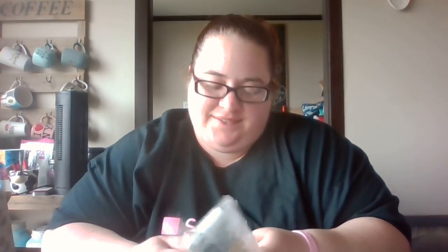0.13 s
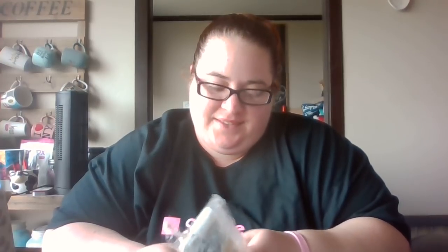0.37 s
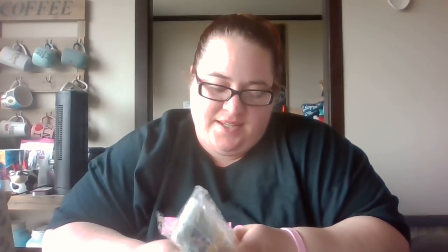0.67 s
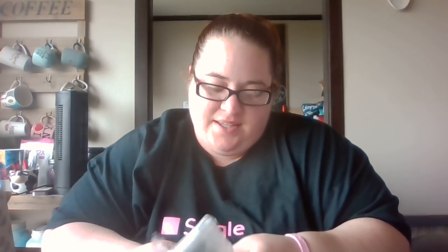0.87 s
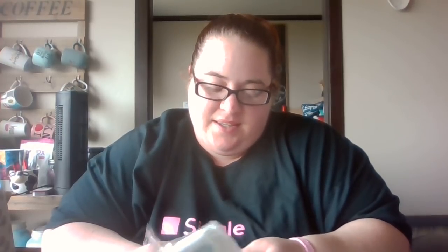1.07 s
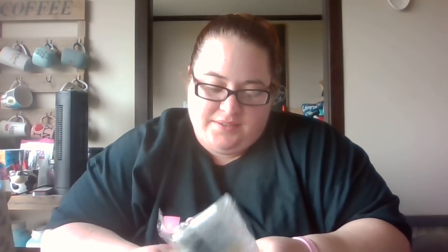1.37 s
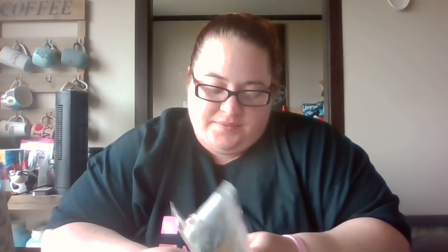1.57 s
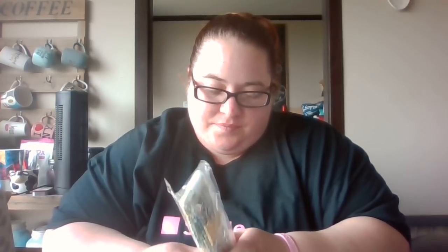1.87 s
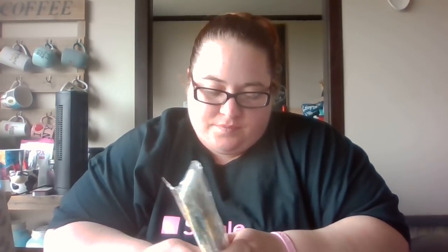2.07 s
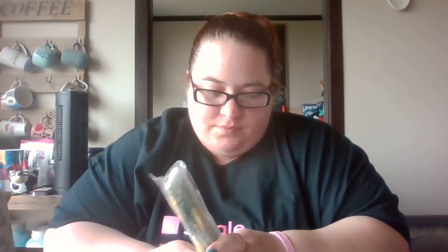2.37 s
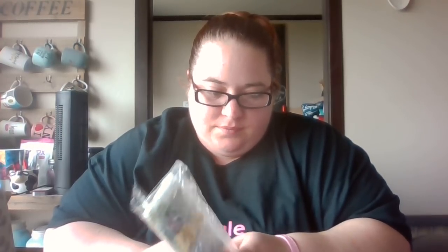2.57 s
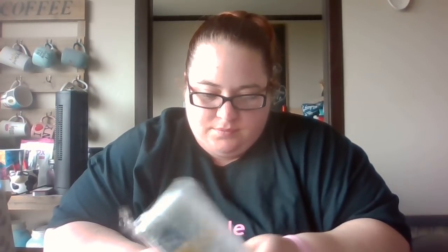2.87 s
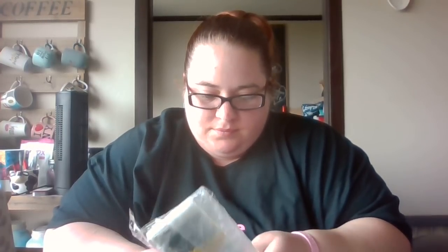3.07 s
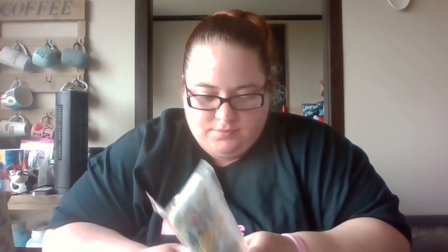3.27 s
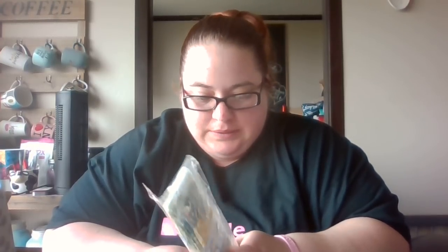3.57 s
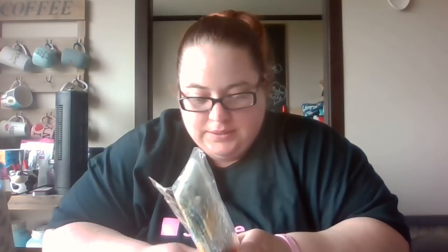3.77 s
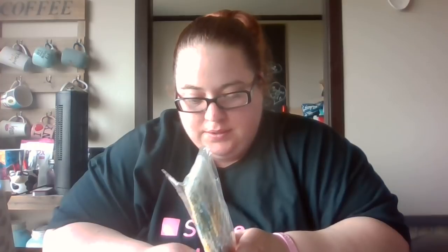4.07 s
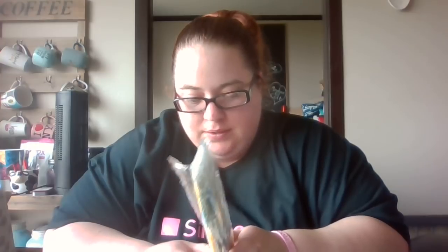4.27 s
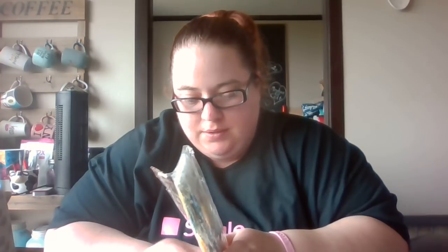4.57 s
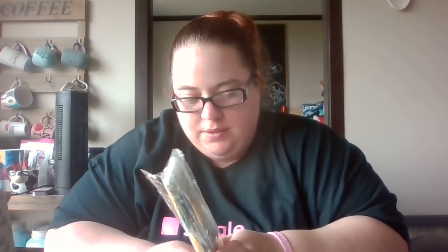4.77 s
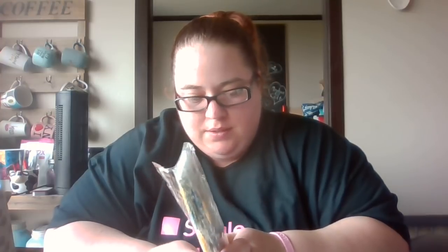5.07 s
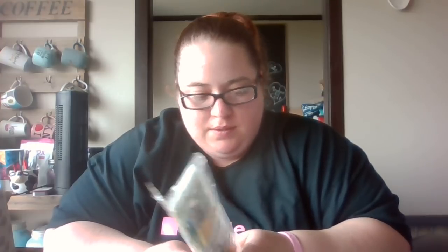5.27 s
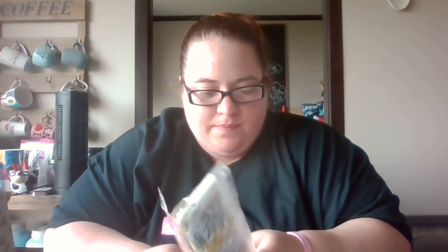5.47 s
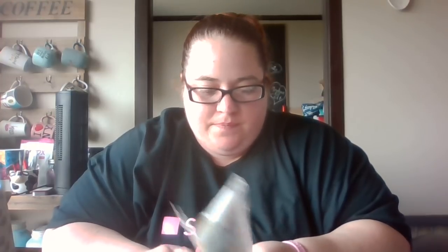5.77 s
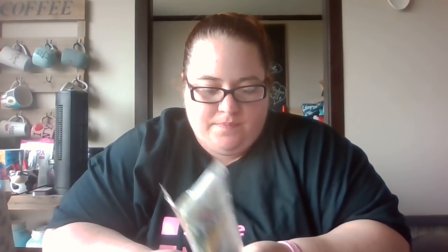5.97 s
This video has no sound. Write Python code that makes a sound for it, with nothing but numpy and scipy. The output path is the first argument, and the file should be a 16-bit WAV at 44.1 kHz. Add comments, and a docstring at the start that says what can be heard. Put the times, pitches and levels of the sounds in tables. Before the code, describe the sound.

Crisp plastic wrapping crinkles in swells and irregular sharp snaps over a faintly hollow pack, handled close to a small microphone indoors.

```python
"""Fine crackle swells up and breaks into sharp snaps: a boxy pack in clear plastic film is turned over in the hands.
Random clicks ring small facets of the film for the crackle; snaps add a click, a flurry of slips and tiny ticks.
The pack underneath answers hollowly through its resonances, with wall pops and soft finger bumps made of ringing noise.
It is close to a small computer microphone in a living room, with echoes, a short room tail and a faint hiss.
The recorder's expander pulls down the pauses, and its narrow speech band cuts off the top."""
import sys
import numpy as np
from scipy import signal
from scipy.fft import rfft, irfft
from scipy.io import wavfile
from scipy.ndimage import uniform_filter1d

SR = 44100
rng = np.random.default_rng(int(sys.argv[2]) if len(sys.argv) > 2 else 0)


def generate_wav(sig):
    """Save sig (samples, or channels by samples) to the path in sys.argv[1] as 16-bit PCM at SR."""
    pcm = np.round(np.clip(np.atleast_2d(sig).T, -1, 1) * 32767).astype(np.int16)
    wavfile.write(sys.argv[1], SR, pcm)


N = 270774
TIME = np.arange(N) / SR
# All levels of sounds are relative: the room, microphone and expander still change them.


def from_db(db):
    """Turn decibels into an amplitude factor."""
    return 10 ** (np.asarray(db) / 20)


def rms_one(x):
    """Scale a sound to an average (RMS) level of 1."""
    return x / np.sqrt(np.mean(x ** 2) + 1e-20)


def add(out, s, sound):
    """Mix a short sound in at time s."""
    start = int(np.clip(round(s * SR), 0, N - 1))
    out[start:start + len(sound)] += sound[:N - start]


def resonance(x, hz, width_hz):
    """Two-pole band-pass: one ringing note with gain 1 at its peak; a narrower one rings longer."""
    r = np.exp(-np.pi * width_hz / SR)
    top = np.array([1, 0, -1]) * (1 - r * r) / 2
    bottom = [1, -2 * r * np.cos(2 * np.pi * hz / SR), r * r]
    return signal.lfilter(top, bottom, x + 1e-18)


def coloured(x, spectrum, size=4096):
    """Causal (minimum-phase) filter that follows a table of pitch_hz, gain_db."""
    hz, db = np.transpose(spectrum)
    log_hz = np.log(np.fft.rfftfreq(size, 1 / SR) + 1)
    gain = from_db(np.interp(log_hz, np.log(hz), db))
    # the first half of the cepstrum gives the filter that answers soonest
    cepstrum = irfft(np.log(gain))[:size // 2]
    cepstrum[0] /= 2
    response = irfft(np.exp(rfft(2 * cepstrum, size)))
    return signal.fftconvolve(x, response)[:len(x)]


def local_rms(x, span_s):
    """Level over a sliding triangular window."""
    width = max(int(span_s * SR), 1)
    power = uniform_filter1d(uniform_filter1d(x * x, width), width)
    return np.sqrt(np.abs(power) + 1e-14)


def wander(span_s):
    """Slow random curve with an RMS of 1 that changes about once per span."""
    width = max(int(span_s * SR), 1)
    return rms_one(uniform_filter1d(uniform_filter1d(rng.standard_normal(N), width), width))


# Tone of the background hiss: pitch_hz, gain_db (only the shape counts)
HISS_TONE = [(100, 8.5), (500, -11), (8000, -11)]


def hiss(level_db=-65.5):
    """Steady random noise, fuller in the bass than in the treble."""
    return from_db(level_db) * rms_one(coloured(rng.standard_normal(N), HISS_TONE))


# Single echoes off the table and screen: delay_s, gain_db
ECHOES = [(0.0078, -15), (0.0106, -19.5)]


def room(x, t60_s=0.32, tail_db=-7, first_s=0.0028, count=16):
    """Direct sound, single echoes, and the walls' diffuse tail, redrawn piece by piece as if the pack moved."""
    out, t, step = x.copy(), TIME[:SR // 2], N // count + 1
    for s, db in ECHOES:
        add(out, s, from_db(db) * x)
    # the tail builds up softly, then falls by 60 dB in t60_s
    fade = from_db(-60 * t / t60_s) * (1 - np.exp(-(t / first_s) ** 2))
    padded = np.pad(x, (step, 2 * step))
    window = np.sqrt(signal.windows.hann(2 * step))
    tails = np.zeros(len(padded) + len(t))
    # overlapping pieces blend one random tail into the next
    for start in range(0, N + step, step):
        tail = fade * rng.standard_normal(len(t)) / np.sqrt(np.sum(fade ** 2))
        heard = signal.fftconvolve(padded[start:start + 2 * step] * window, tail)
        tails[start:start + len(heard)] += heard
    return out + from_db(tail_db) * tails[step:step + N]


# Soft bumps of the fingers on the pack: loudest_s, level_db, pitch_hz
FINGER_BUMPS = [(0.169, -38.5, 226), (0.533, -46.5, 493), (0.661, -45.5, 514), (2.719, -48, 290),
                (2.726, -43.5, 185), (2.946, -39, 150), (3.242, -37.5, 480), (5.412, -44, 275),
                (5.456, -40, 169), (5.624, -46.5, 198)]


def bumps(rise_s=0.0076, width_hz=125):
    """Fingertips land softly: a rounded burst of noise passes twice through one low ringing note."""
    out, t = np.zeros(N), TIME[:SR // 8]
    for s, db, hz in FINGER_BUMPS:
        push = rng.standard_normal(len(t)) * t * np.exp(-t / rise_s)
        thud = resonance(resonance(push, hz, width_hz), hz, width_hz)
        # start early, so that the push is strongest at time s
        add(out, s - rise_s, from_db(db) * thud / np.abs(thud).max())
    return out


# Pops of the pack's stiff wall as it flexes: start_s, level_db, pitch_hz
WALL_POPS = [(0.163, -33.5, 730), (1.168, -26.5, 1200), (1.317, -24.5, 1380), (1.329, -36.5, 1740),
             (1.817, -40, 1070), (2.95, -25, 1130), (3.761, -41.5, 740), (5.351, -26, 1160)]


def flexes(ring_s=0.013, width_hz=450):
    """The stiffer wall pops lower than the film: fading noise rings one broad note."""
    out, t = np.zeros(N), TIME[:SR // 16]
    for s, db, hz in WALL_POPS:
        push = rng.standard_normal(len(t)) * np.exp(-t / ring_s)
        pop = resonance(resonance(push, hz, width_hz), hz, 2 * width_hz)
        add(out, s, from_db(db) * pop / np.abs(pop).max())
    return out


# Notes at which the hollow pack rings: pitch_hz, width_hz, gain_db
PACK_NOTES = [(150, 39, -15), (231.6, 24, -10), (426.5, 28, 2.5), (472, 110, 3), (621, 91, 7.5),
              (800, 1100, -10.5), (930, 180, -11), (1405, 60, -15.5)]


def pack(push, uneven_db=0):
    """The hollow pack rings in its few resonances, each as strongly as the point of contact allows."""
    touch_db = uneven_db * rng.standard_normal(len(PACK_NOTES))
    return sum(from_db(db + extra) * resonance(push, hz, width)
               for extra, (hz, width, db) in zip(touch_db, PACK_NOTES))


def audible(x):
    """The film radiates little at the very top."""
    return signal.sosfilt(signal.butter(6, 8000, fs=SR, output="sos"), x)


def dispersed(x, travel_s):
    """Bending waves in thin film: the treble arrives first, lower notes later; travel_s holds at 4 kHz."""
    hz = np.fft.rfftfreq(len(x), 1 / SR)
    delay_phase = np.exp(-4j * np.pi * travel_s * np.sqrt(4000 * hz))
    return irfft(rfft(x) * delay_phase, len(x))


# How fast a squeeze takes hold (dB/s), tightens (dB in all), and lets go (dB/s)
GRIP_DB_PER_S, SWELL_DB, RELEASE_DB_PER_S = 912.5, 6, 254
# Crackle that a snap sets off, relative to the snap's level, and how fast it calms
UNREST_DB, UNREST_DB_PER_S = -22, 328.5
LEAD_S = 0.0033   # the crackle around a snap starts this long before it


def effort_db():
    """Crackle level: squeezes swell and relax, and every timed snap unsettles the creases around it."""
    swells = []
    for s, length, db, _ in SQUEEZES:
        tightening = SWELL_DB * np.clip((TIME - s) / length - 1, -1, 0)
        before = GRIP_DB_PER_S * np.maximum(s - TIME, 0)
        after = RELEASE_DB_PER_S * np.maximum(TIME - s - length, 0)
        swells.append(db + tightening - before - after)
    power = from_db(np.max(swells, axis=0)) ** 2
    for s, db, _, _ in TIMED_SNAPS:
        unrest_db = db + UNREST_DB - UNREST_DB_PER_S * TIME[:SR // 5]
        add(power, s - LEAD_S, from_db(unrest_db) ** 2)
    return 10 * np.log10(power + 1e-12)


# Fingers squeeze the film, harder and harder until they let go:
# start_s, length_s, tightest_crackle_level_db, pack_answer_db (relative to the crackle level)
SQUEEZES = [(0.0, 0.057, -42, -14.5), (0.156, 0.036, -30, -37), (0.238, 0.11, -50, -16),
            (0.4, 0.14, -41.5, -21.5), (0.654, 0.23, -39, -8), (0.954, 0.23, -32, -12.5),
            (1.214, 0.088, -45, -21), (1.367, 0.14, -31.5, -16.5), (1.529, 0.17, -39, -14.5),
            (1.764, .225, -41.5, -15), (2.38, 0.31, -36, -14.5), (2.764, 0.095, -38, -9),
            (2.904, 0.042, -20, -9.5), (3.04, 0.23, -36.5, -10), (3.382, 0.22, -39, -15.5),
            (3.591, 0.069, -44.5, -2.5), (3.963, 0.029, -42, -18.5), (4.282, 0.11, -46, -7.5),
            (4.489, 0.039, -46, -17.5), (4.733, 0.23, -42, -12), (5.113, 0.19, -34.5, -9),
            (5.349, 0.071, -28.5, -19), (5.451, 0.017, -37, -3), (5.488, .11, -40.5, -5),
            (5.703, 0.13, -33.5, -21), (6.028, 0.25, -36, -9.5)]
# Tone of the film's crackle: pitch_hz, gain_db
FILM_TONE = [(300, -39.5), (800, -2.5), (1300, -5.5), (1800, -1.5), (2500, -0.5), (4800, -1), (6500, -3),
             (8000, -12)]


def crackle(effort, per_s=430, rate_growth=0.54, spread_db=1.5, facet_q=17.4, crack=0.22, rub_db=-27,
            even_s=0.097, travel_s=0.0008236, knock_share=.17, clump_db=2.0, clump_s=0.0047,
            contact_db=5.0, contact_s=.014, film_db=-6.0, pack_db=-5.5, count=24):
    """Swarms of tiny creases, thicker when the hands press harder, over the rub of skin on film."""
    s, length, _, answer_db = np.transpose(SQUEEZES)
    level = from_db(effort)
    born = rng.random(N) < per_s * (level / level.mean()) ** rate_growth / SR
    size_db = spread_db * np.minimum(rng.exponential(1, N), 4)
    clicks = born * rng.choice([-1, 1], N) * from_db(size_db)
    rub = from_db(rub_db) * rng.standard_normal(N)
    # each crease rings one randomly dealt facet of the film for a few cycles
    dealt = rng.integers(0, count, N)
    facets = np.geomspace(1200, 7200, count)
    film = sum(resonance(clicks * (dealt == k), hz, hz / facet_q) for k, hz in enumerate(facets))
    film = coloured(audible(dispersed(film + crack * (clicks + rub), travel_s)), FILM_TONE)
    # only creases that lie against the pack knock on it
    hollow = pack(clicks * (rng.random(N) < knock_share) + rub)
    answer = from_db(np.interp(TIME, s + length / 2, answer_db) + pack_db)
    # creases give way in clumps, and the film touches and leaves the pack
    clumps = from_db(film_db + clump_db * wander(clump_s))
    contact = from_db(contact_db * wander(contact_s))
    # level both out first, so that the effort sets the loudness
    even_film = film / local_rms(film, even_s)
    even_hollow = hollow / local_rms(hollow, even_s)
    return level * (clumps * even_film + contact * answer * even_hollow)


def small_snaps(effort, per_s=40, above_crackle_db=14.5, spread_db=2.5, top_db=-18.5,
                facet_hz=3880, facet_spread_octaves=0.5, answer_db=-22.5):
    """More creases give way at random, as strongly as the film is worked: rows like TIMED_SNAPS."""
    born = np.flatnonzero(rng.random(N) < per_s / SR)
    size, facet = rng.standard_normal((N, 2))[born].T
    # the level is capped before its random spread is added
    db = np.minimum(effort[born] + above_crackle_db, top_db) + spread_db * size
    hz = np.clip(facet_hz * 2 ** (facet_spread_octaves * facet), 1200, 7200)
    return np.column_stack([born / SR, db, hz, db + answer_db])


# Creases that snap through at given times, from faint ticks to sharp cracks:
# start_s, level_db, facet_pitch_hz, pack_answer_level_db
TIMED_SNAPS = [(0.097, -34, 7040, -65), (0.1332, -17, 4520, -44), (0.1617, -8, 4200, -31.5),
               (0.1944, -10.5, 3480, -37.5), (0.2881, -23, 2300, -48.5), (0.3299, -26, 2410, -64),
               (0.3857, -18.5, 6400, -53), (0.503, -21.5, 5030, -59), (0.5195, -28, 4000, -45.5),
               (0.6225, -34, 2330, -53), (0.7333, -28, 3500, -40), (0.8076, -23, 4400, -62),
               (0.8842, -21, 4090, -53), (1.005, -18.5, 4440, -42.5), (1.0478, -11.5, 3490, -34.5),
               (1.0854, -13.5, 6180, -55), (1.1894, -20.5, 4800, -36), (1.3086, -22.5, 6570, -40.5),
               (1.3175, -20.5, 4820, -35), (1.326, -13.5, 3230, -49), (1.3808, -22.5, 5000, -49),
               (1.4542, -11, 4860, -31), (1.481, -10.5, 3250, -34), (1.5432, -23.5, 5130, -45.5),
               (1.6591, -17.5, 2540, -47), (1.7631, -23, 3130, -46), (1.8598, -21, 5540, -47),
               (1.9059, -21.5, 2420, -59), (2.0571, -22, 3880, -76), (2.1166, -19, 2350, -45),
               (2.2167, -21, 3200, -42), (2.2805, -21.5, 5770, -63), (2.3544, -26, 6030, -58),
               (2.42, -28, 3080, -62), (2.4788, -21.5, 3900, -40), (2.4993, -19.5, 5370, -50),
               (2.5694, -17.5, 3950, -46), (2.61, -16.5, 4030, -43), (2.7839, -16, 4900, -50),
               (2.83, -17, 5500, -51), (2.8645, -15, 5320, -48), (2.9178, -12.5, 3350, -35.5),
               (2.9391, -16, 2600, -34), (2.9472, -10, 4530, -30), (2.9607, -10.5, 2430, -42),
               (2.9935, -21, 2470, -29), (3.1252, -29, 2440, -43), (3.1393, -18, 6950, -48),
               (3.1629, -15, 4430, -38.5), (3.1844, -17, 2470, -36), (3.1959, -11, 5200, -35),
               (3.2436, -12.5, 4230, -37.5), (3.3148, -21.5, 5550, -54), (3.3701, -26.5, 3330, -56),
               (3.4858, -22.5, 4820, -43), (3.5155, -20.5, 4960, -38.5), (3.6598, -20.5, 3400, -44),
               (3.7169, -18, 4510, -57), (3.7232, -15, 6740, -34.5), (3.8262, -25, 6100, -47.5),
               (3.9204, -26.5, 1970, -74), (3.93, -27, 5330, -71), (3.9564, -22.5, 2730, -40.5),
               (4.0103, -26, 6600, -61), (4.0868, -22, 5000, -44.5), (4.1391, -32.5, 5100, -44),
               (4.1889, -32, 2420, -54.5), (4.2373, -48, 2180, -53), (4.2776, -23.5, 3700, -49),
               (4.3827, -23.5, 3090, -36.5), (4.4829, -25.5, 5100, -38.5), (4.5479, -10.5, 5080, -50),
               (4.565, -23.5, 5260, -61), (4.6204, -25, 3610, -43), (4.702, -30.5, 4330, -49.5),
               (4.7437, -22.5, 6370, -48), (4.7803, -19.5, 3240, -41.5), (4.8233, -21, 3980, -40),
               (4.8732, -20, 6250, -36), (4.8808, -19.5, 4200, -39.5), (4.9045, -17, 4390, -35),
               (4.9376, -19, 3350, -34.5), (4.9894, -23.5, 3950, -63), (5.0325, -20.5, 5300, -43.5),
               (5.0553, -17.5, 4000, -44), (5.1124, -13.5, 5230, -49.5), (5.1831, -16.5, 5070, -35.5),
               (5.225, -19, 5200, -45), (5.2899, -20, 4630, -44), (5.3342, -11, 5400, -39),
               (5.3487, -10.5, 4630, -34), (5.3766, -21, 4430, -42), (5.3973, -17, 4760, -32.5),
               (5.428, -17.5, 2520, -29.5), (5.685, -21, 6180, -67), (5.733, -27.5, 3800, -60),
               (5.7617, -12.5, 4560, -36.5), (5.8109, -20.5, 7000, -36), (5.8402, -14.5, 6490, -36),
               (5.9756, -25, 4730, -42.5), (6.0347, -18, 2700, -42), (6.1, -13, 5130, -34.5)]
# Tone that all snaps share: pitch_hz, gain_db
SNAP_TONE = [(300, -11.5), (800, -6), (1500, 1.5), (4000, 2.5), (6800, 6.5), (8000, -2.5)]


def snaps(rows, buckle_s=0.00072, slips_db=-1, settle_s=0.034, settle_db=-28, grain_db=7,
          travel_s=0.000421, facet_width_hz=800, panel_hz=1700, panel_width_hz=450, panel_db=-5,
          crack_db=-11, push_s=0.0026, film_db=-13.5):
    """A crease flips with a click and slips, rings its facet and a wider panel, ticks, and jolts the pack."""
    out, t = np.zeros(N), TIME[:SR // 15]
    level_span = .003 * SR   # a snap has the energy of its level held for 3 ms
    for s, db, hz, answer_db in rows:
        slips, jolt, tick_size = rng.standard_normal((3, len(t)))
        # every crease varies around the typical settings
        slowness, distance, panel_size, damping = np.exp(rng.normal(0, 0.428, 4))
        stage = t / (buckle_s * slowness)
        ticks = rms_one(slips * from_db(2 * grain_db * np.minimum(tick_size, 3)))
        settling = ticks * from_db(settle_db) * np.exp(-t / settle_s)
        flurry = slips * stage * np.exp(1 - stage) + settling
        flip = rms_one(signal.unit_impulse(len(t))) + from_db(slips_db) * rms_one(flurry)
        flip = audible(dispersed(flip, travel_s * distance))
        facet = resonance(flip, hz, facet_width_hz * damping)
        panel = resonance(flip, panel_hz / panel_size, panel_width_hz * damping)
        rings = facet - from_db(panel_db) * panel
        film = coloured(rings + from_db(crack_db) * flip, SNAP_TONE, size=512)
        hollow = pack(audible(jolt * np.exp(-t / push_s)), uneven_db=10.5)
        both = from_db(db + film_db) * rms_one(film) + from_db(answer_db) * rms_one(hollow)
        add(out, s, np.sqrt(level_span / len(t)) * both)
    return out


def scene():
    """The handled pack, its room and a faint hiss."""
    effort = effort_db()
    creases = snaps(TIMED_SNAPS) + snaps(small_snaps(effort))
    handled = crackle(effort) + flexes() + bumps() + creases
    # room() also holds the direct sound, so that is heard at double strength
    return (handled + room(handled) + hiss())[None]


def expander(x, threshold_db=-51, slope=1.02, depth_db=17, span_s=0.011):
    """Whatever falls below the threshold is turned down further, by depth_db at most."""
    level_db = 20 * np.log10(local_rms(x, span_s))
    return x * from_db(np.clip(slope * (level_db - threshold_db), -depth_db, 0))


# How strongly the microphone picks up each pitch: pitch_hz, gain_db
MICROPHONE_TONE = [(60, -33), (100, -20.5), (125, -10.5), (400, -5.5), (6800, -4), (7500, -5),
                   (8200, -10.5), (8900, -15.5), (9600, -44)]


def record(dry, cutoff_hz=9400):
    """Microphone tone, expander, and the steep upper edge of the band."""
    sound = expander(coloured(dry[0], MICROPHONE_TONE))
    band_edge = signal.ellip(10, .1, 80, cutoff_hz, fs=SR, output="sos")
    return signal.sosfilt(band_edge, sound)[None]


dry = scene()
out = record(dry)
generate_wav(out)
```